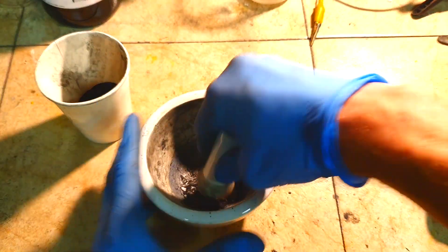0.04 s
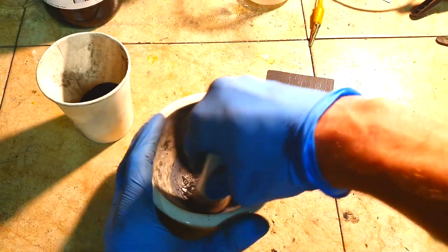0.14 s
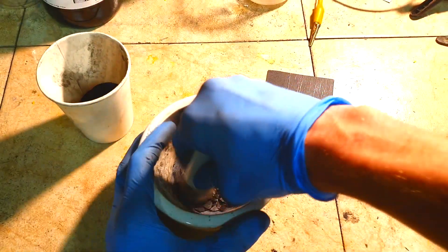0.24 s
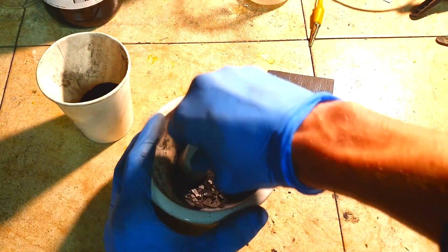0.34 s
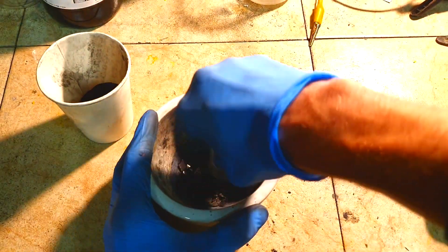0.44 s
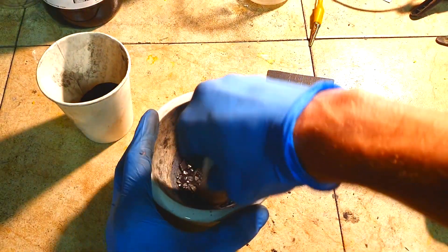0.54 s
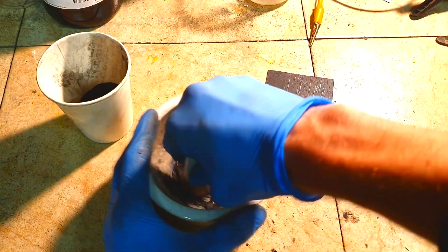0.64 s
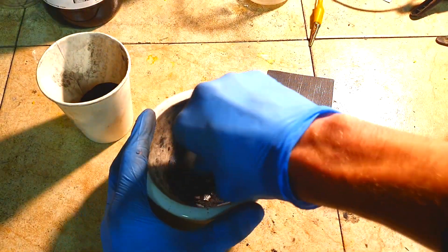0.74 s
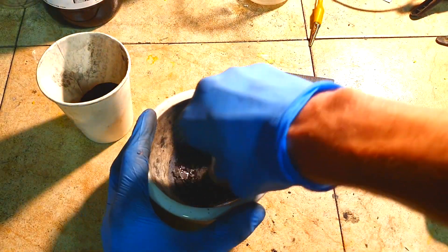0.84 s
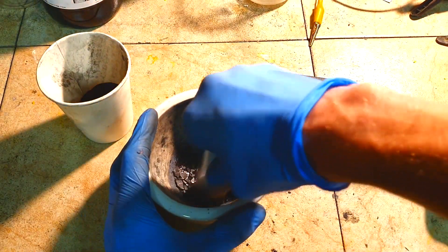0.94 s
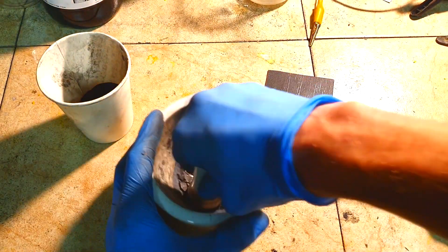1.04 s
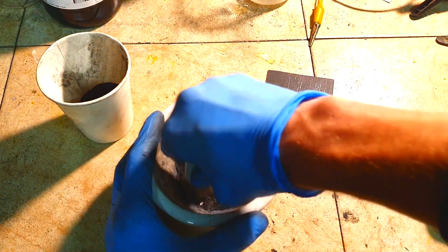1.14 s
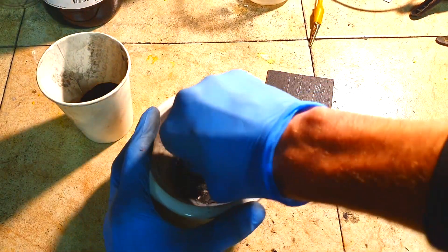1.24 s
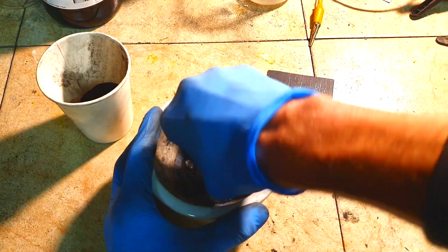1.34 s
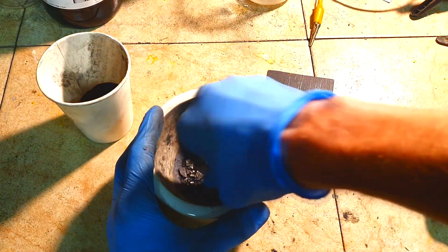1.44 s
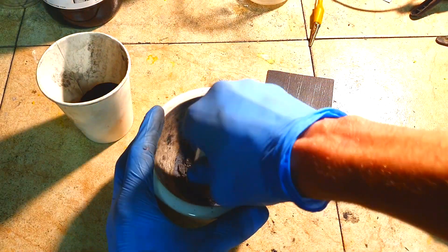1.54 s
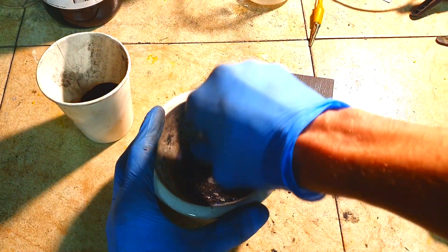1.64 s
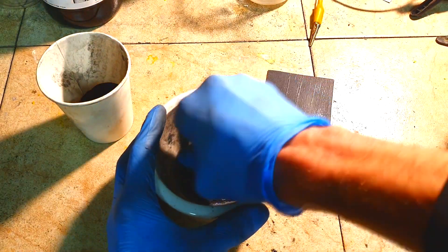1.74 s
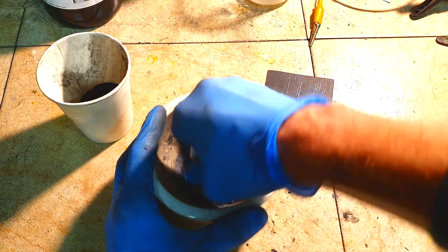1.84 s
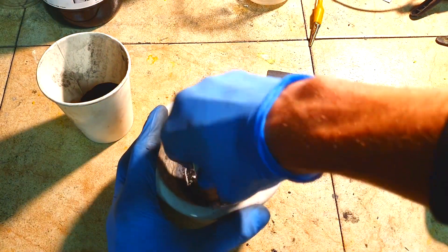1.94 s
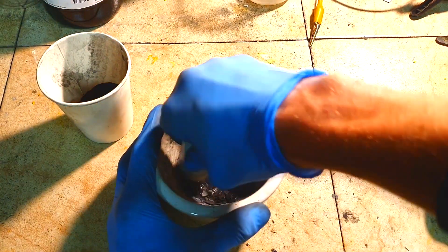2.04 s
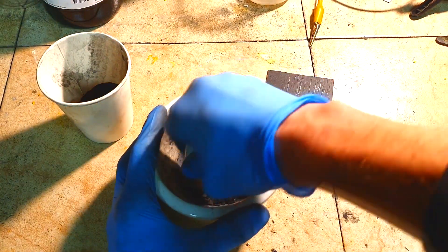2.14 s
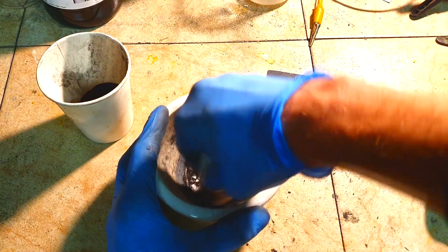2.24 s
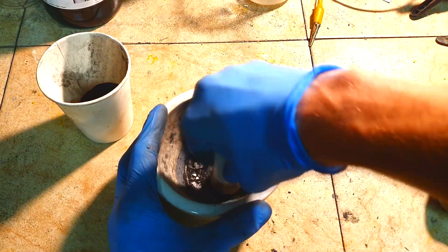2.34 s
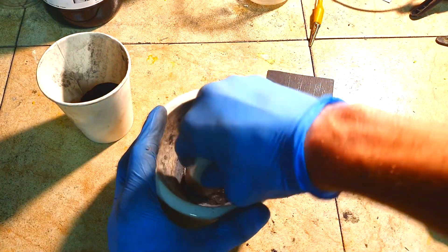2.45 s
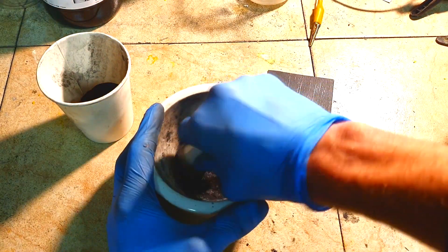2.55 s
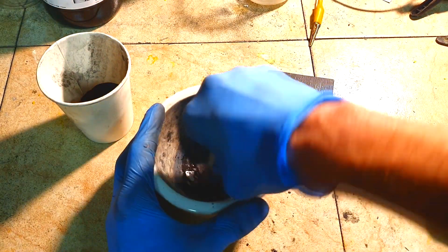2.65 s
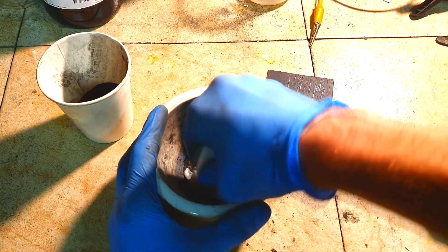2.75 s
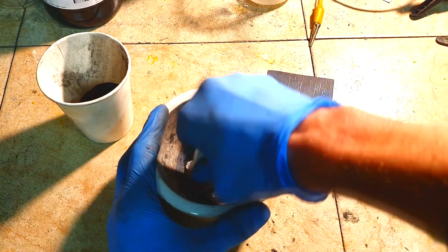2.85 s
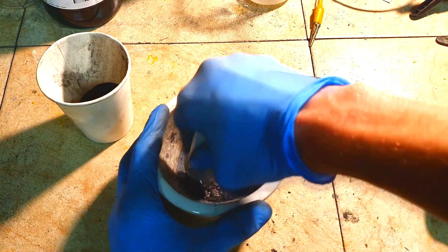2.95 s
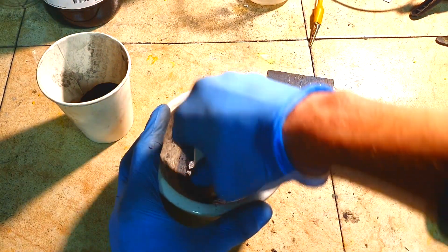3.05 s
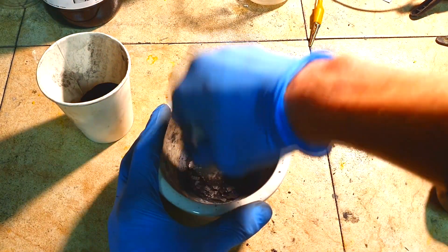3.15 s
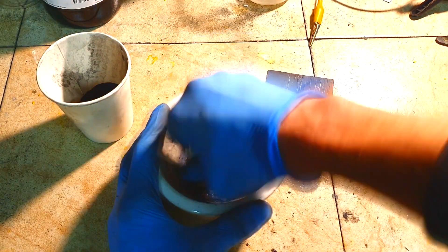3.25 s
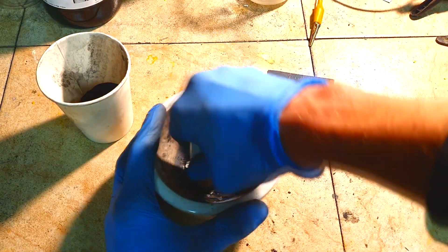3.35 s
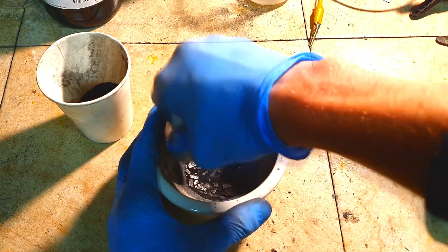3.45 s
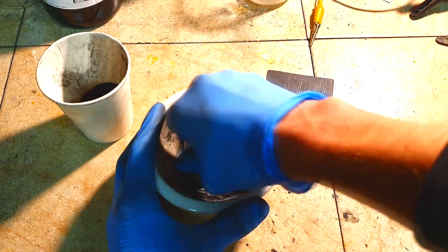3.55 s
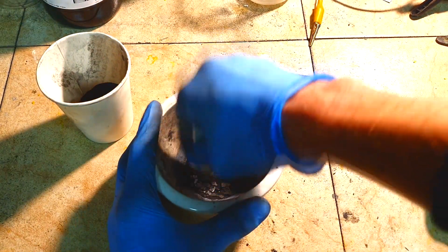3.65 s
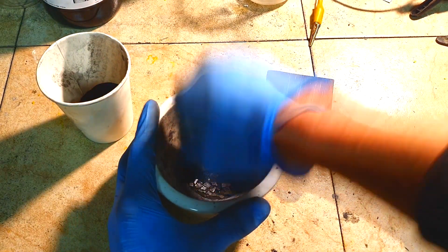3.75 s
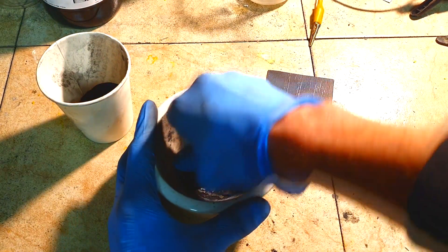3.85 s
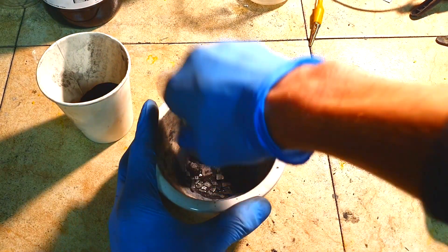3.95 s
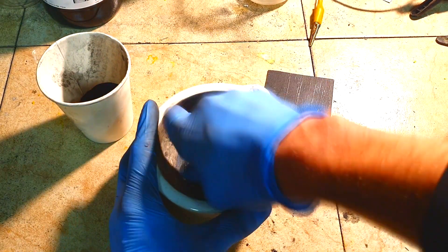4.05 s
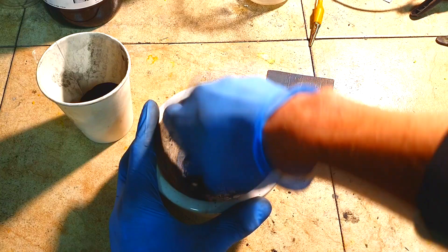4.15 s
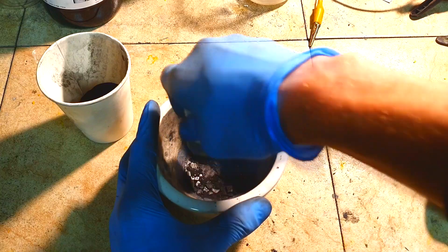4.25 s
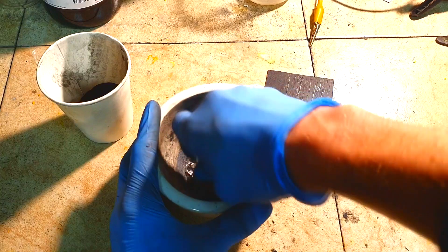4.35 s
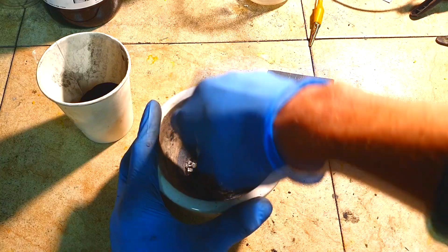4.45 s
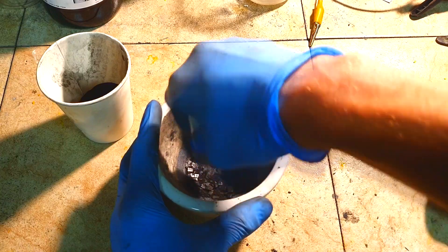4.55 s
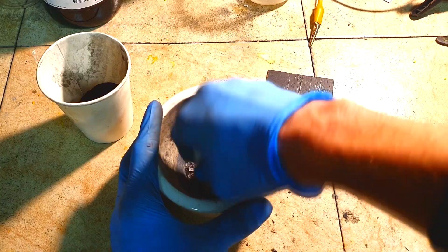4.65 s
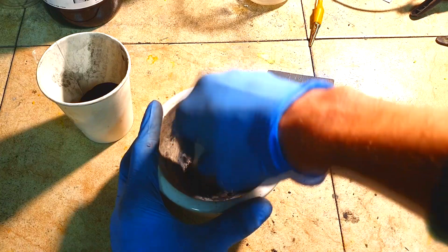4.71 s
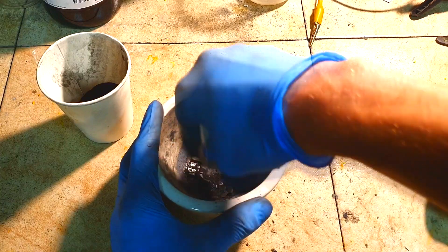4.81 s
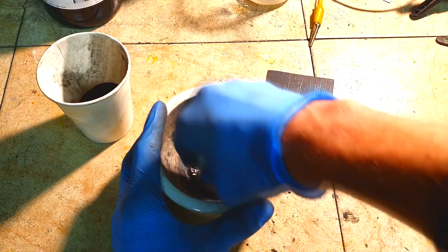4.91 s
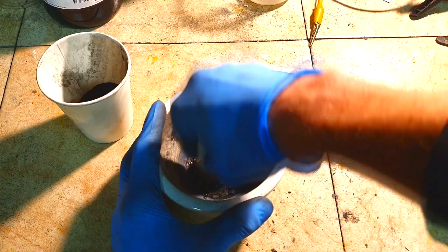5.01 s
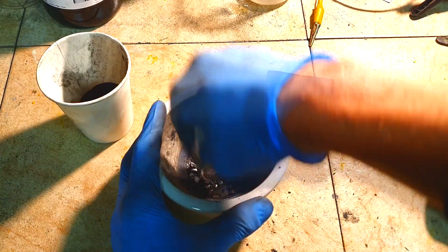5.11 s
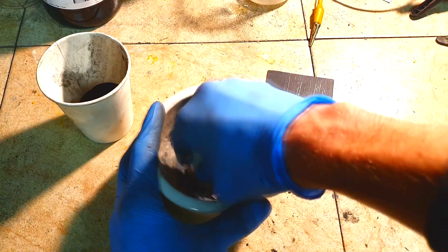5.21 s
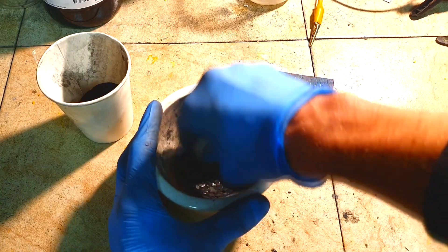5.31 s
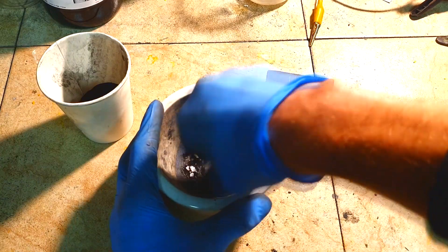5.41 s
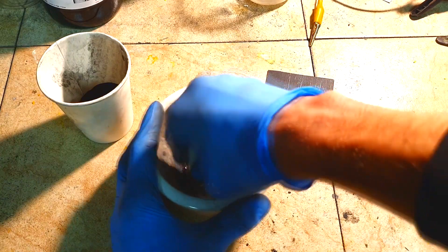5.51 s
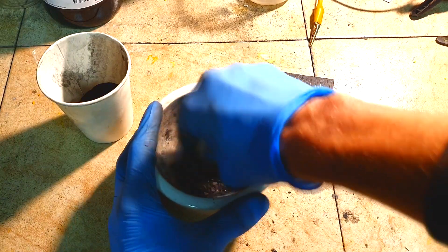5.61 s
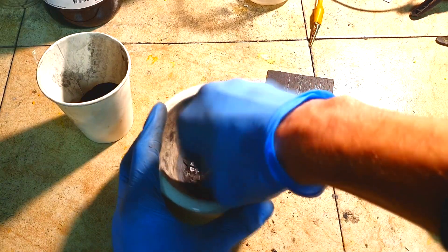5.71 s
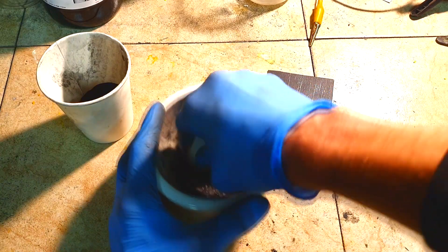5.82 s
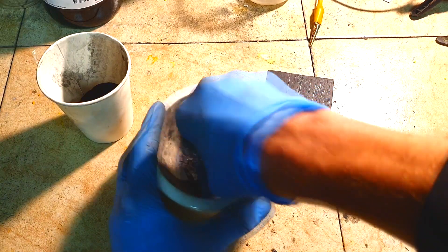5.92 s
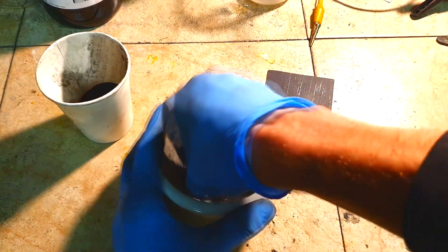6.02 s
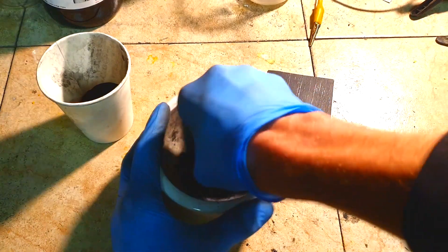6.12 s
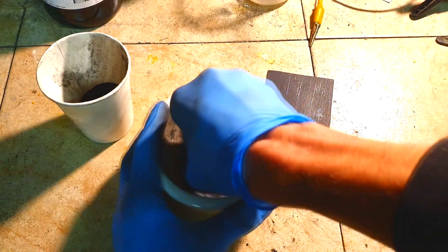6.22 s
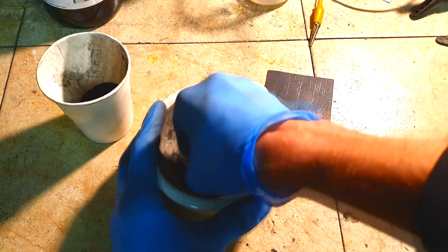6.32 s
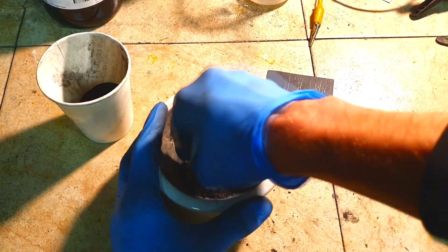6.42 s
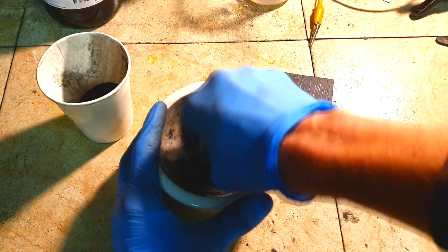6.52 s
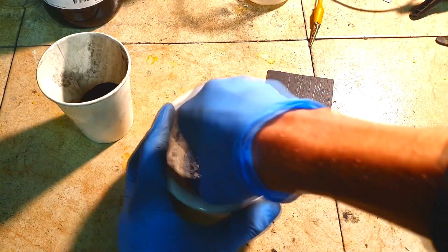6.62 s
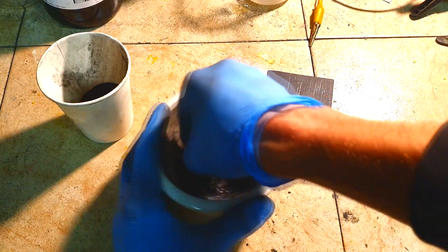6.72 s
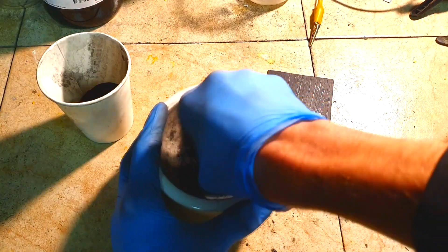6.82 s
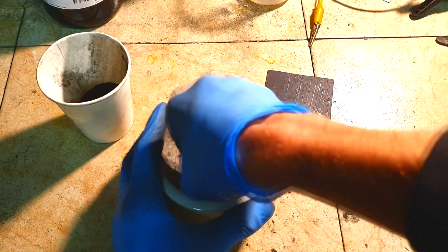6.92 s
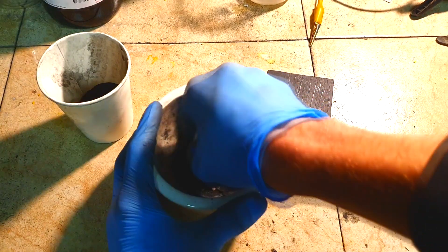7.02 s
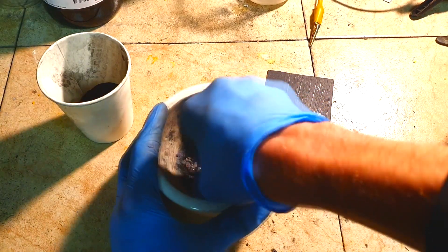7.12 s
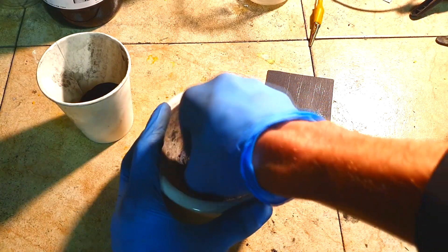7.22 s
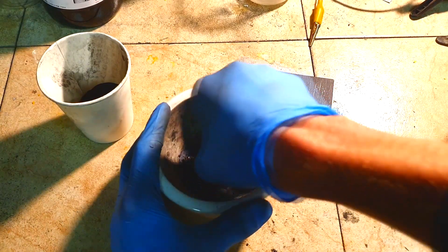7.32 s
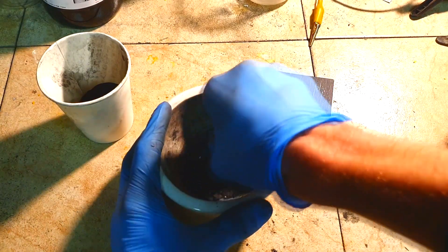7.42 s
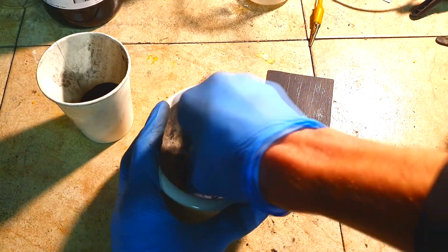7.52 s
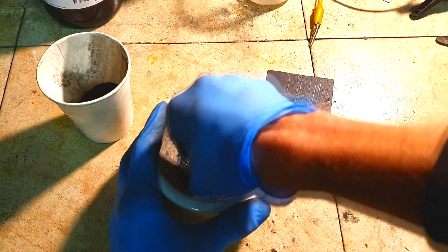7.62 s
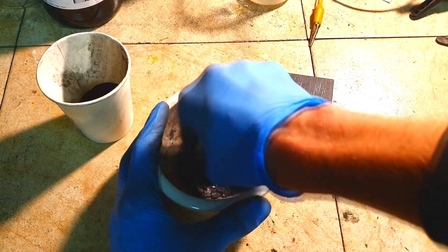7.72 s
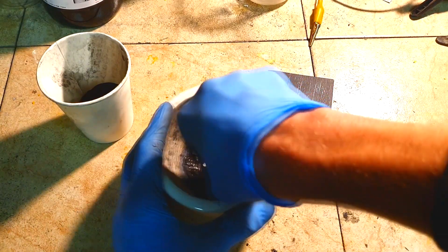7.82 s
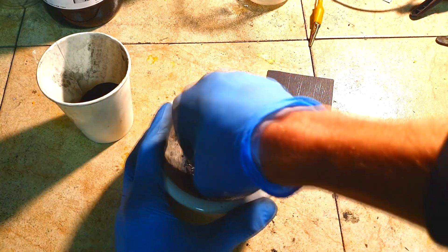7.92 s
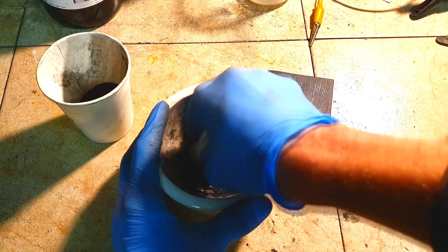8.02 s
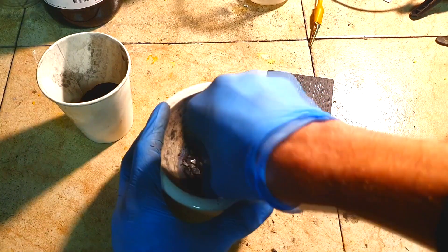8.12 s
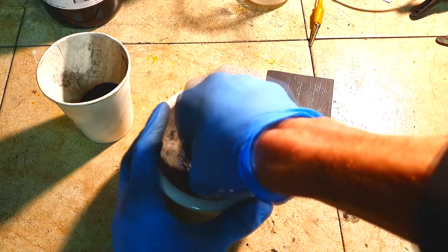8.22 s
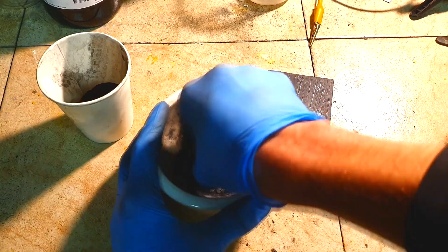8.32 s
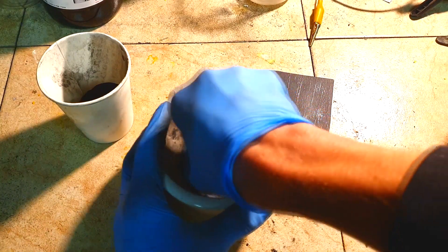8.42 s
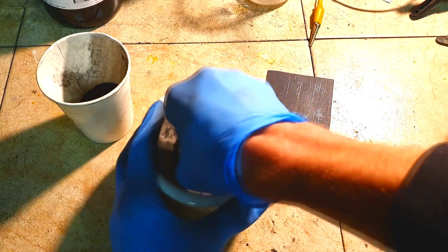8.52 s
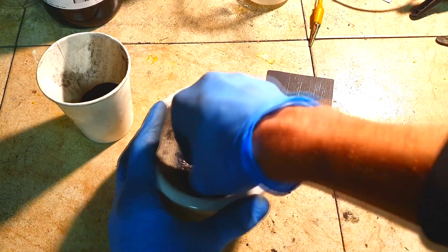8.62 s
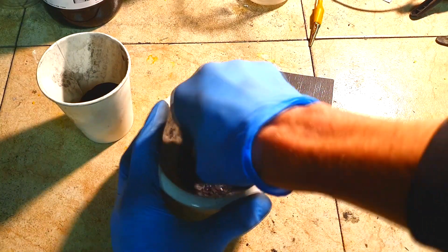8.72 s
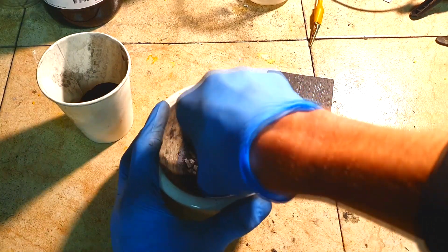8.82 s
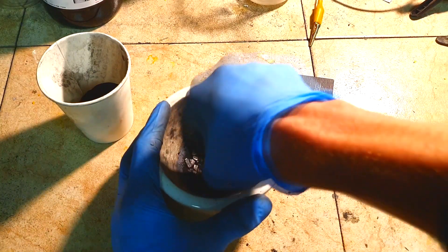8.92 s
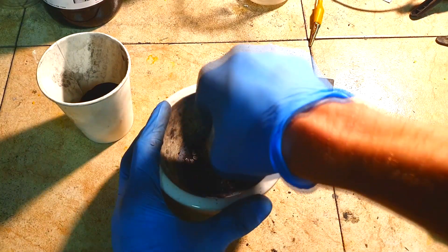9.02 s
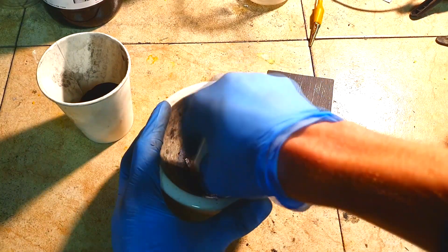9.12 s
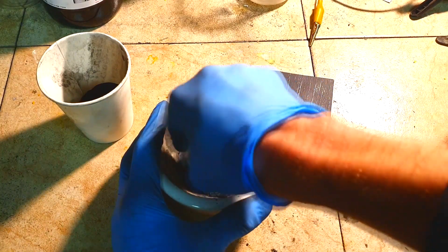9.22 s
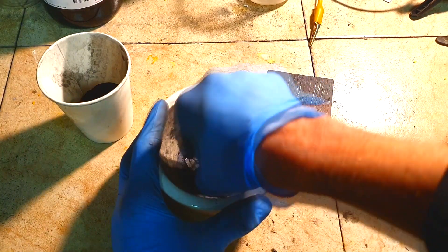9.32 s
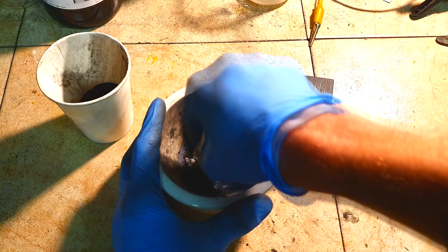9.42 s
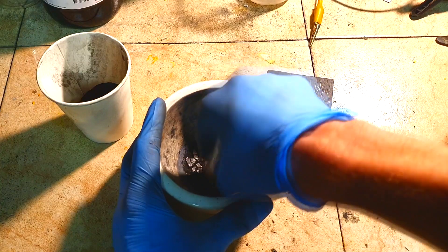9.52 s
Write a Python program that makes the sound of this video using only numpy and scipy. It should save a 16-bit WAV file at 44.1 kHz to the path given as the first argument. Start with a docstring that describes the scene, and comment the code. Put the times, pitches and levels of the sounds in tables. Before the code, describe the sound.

In a small quiet room, a pestle rubs and taps inside a ceramic bowl, ringing it briefly. Then hard blows come about four a second, thumping the bench and shattering flakes. Longer grinding follows, with stuttering knocks, brittle crunches and fine dusty fizz, before a few final bright clacks. Close stereo pickup, with faint air and low rumble underneath.

```python
"""On a bench in a small room, a ceramic pestle knocks, pounds and grinds brittle flakes in a ceramic mortar.
Blows and slips shake the bench, heard as sums of dying sine waves; knocks on the wall ring the bowl.
Clacks, snaps and fizz are short puffs of coloured noise; grinding sets off many tiny grains of sound.
Noise tails give the answer of the room, over quiet air and a low rumble."""
import sys
import numpy as np
from scipy import signal
from scipy.fft import rfft, irfft, next_fast_len
from scipy.io import wavfile
from scipy.ndimage import uniform_filter1d

SR = 44100
rng = np.random.default_rng(int(sys.argv[2]) if len(sys.argv) > 2 else 0)


def unload_audio(sound):
    """Save the sound as a 16-bit wav file, at the path given as the first command line argument."""
    columns = np.transpose(np.atleast_2d(sound))
    # keep every value between -1 and 1, then stretch to whole-number steps
    steps = np.round(np.clip(columns, -1, 1) * 32767)
    wavfile.write(sys.argv[1], SR, steps.astype(np.int16))


N = 421596  # samples in the whole scene


def gain_of(db):
    """Turns decibels into a gain."""
    return 10 ** (np.asarray(db) / 20)


def evened(x):
    """Scales a sound to an average (rms) strength of 1."""
    return x / np.sqrt(np.mean(x ** 2) + 1e-20)


def read(points, hz):
    """Reads a table of (pitch_hz, value) between its points, on a log pitch axis."""
    f, value = np.transpose(points)
    return np.interp(np.log(hz + 1), np.log(f + 1), value)


def add(mix, s, sound):
    """Mixes a sound in at time s, cut off at the end of the mix."""
    part = mix[..., round(s * SR):][..., :sound.shape[-1]]
    part += sound[..., :part.shape[-1]]


def coloured(x, spectrum):
    """Makes some pitches of a noise louder than others, as a spectrum table says."""
    size = next_fast_len(x.shape[-1])
    hz = np.fft.rfftfreq(size, 1 / SR)
    return irfft(rfft(x, size) * gain_of(read(spectrum, hz)), size)[..., :x.shape[-1]]


# How alike noise is in the left and right channels: pitch_hz, likeness (1 = identical)
LIKENESS = [(60, 0.81), (250, 1), (700, 0.4), (1500, 0.27), (5000, 0.083)]


def pair(length, shape):
    """Two-channel noise, most alike in the bass, weighted over pitch and time by shape(hz, t)."""
    frames, hz = length // 128 + 5, np.fft.rfftfreq(512, 1 / SR)[:, None]
    a, b, c, d = rng.standard_normal((frames, 257, 4)).T
    left, other = a + 1j * b, c + 1j * d
    same = np.clip(read(LIKENESS, hz), 0, 1)
    right = same * left + np.sqrt(1 - same ** 2) * other
    z = np.array([left, right]) * shape(hz, np.arange(frames) * 128 / SR)
    return signal.istft(z, nperseg=512, noverlap=384)[1][:, :length]


def burst(spectrum, t60):
    """A puff of coloured noise that starts sharply and falls 60 dB in t60 seconds; peak 1."""
    t = np.arange(6000) / SR
    x = evened(coloured(pair(6000, lambda hz, s: 1), spectrum)) * gain_of(-60 * t / t60)
    return x / abs(x).max()


# Ways the bench vibrates: pitch_hz before detuning, level_db (relative), fade_s (to fall 60 dB, before damping)
BENCH_MODES = [(51.5, -25, 1), (106, -28, 1), (219.3, -10.5, 0.57), (261, -5.5, 0.17), (311.4, 2, 0.1),
               (429.2, -0.5, 0.23), (524.2, -3, 0.14), (665, 2.5, 0.043), (740.5, 4.5, 0.059),
               (812, 5.5, 0.054), (1100, -0.5, 0.084), (1236, 0.5, 0.043), (1422, -4, 0.047)]


def thud(scatter_db, damping, rise_s, hard_db):
    """Bench modes sum to a thud, weighted and detuned anew by where the pestle lands; peak 1."""
    # each mode comes as a close pair
    hz, db, t60 = np.transpose(BENCH_MODES + BENCH_MODES)[:, :, None]
    weight, phase, detune, wide = rng.standard_normal((4, len(hz), 1))
    t = np.arange(6000) / SR
    brightness = hard_db * np.log2(np.maximum(hz / 300, 1))  # a hard landing lifts the higher modes
    level = gain_of(db + scatter_db * weight + brightness - 60 * damping * t / t60)
    turn = 2 * np.pi * hz * (1 + 0.035 * detune) * t + 1.32 * phase
    shift = wide * hz ** 2 / 1710000.0  # higher modes differ more between left and right
    x = np.array([(level * np.sin(turn + side * shift)).sum(0) for side in (1, -1)])
    quick = 1 + 0.92 * np.exp(-t / 0.0095)  # the first swings are strong and spread away fast
    x = x * quick * np.minimum(t / rise_s, 1) * np.minimum(4 - 4 * t / t[-1], 1)
    return x / abs(x).max()


# The pestle's own thin ring: pitch_hz, level_db (relative), fade_s (to fall 60 dB)
PESTLE_MODES = [(15070, -6.5, 0.068), (14520, -5, 0.12), (14800, -16, 0.12)]


def pestle(db):
    """The pestle sings briefly: a few high sine waves that die away."""
    hz, mode_db, t60 = np.transpose(PESTLE_MODES)[:, :, None]
    t = np.arange(6000) / SR
    level = gain_of(db + mode_db - 60 * t / t60)
    return (level * np.sin(2 * np.pi * hz * t)).sum(0) * np.ones((2, 1))


# Ceramic on ceramic, as noise: pitch_hz, level_db (relative)
CLACK_SPECTRUM = [(700, -6.5), (1100, 4.5), (1400, -4), (1620, -7), (2000, 4), (2900, -2.5), (3800, -8),
                  (6000, -17.5), (11000, -39)]
# Flakes shattered by a blow: pitch_hz, level_db (relative)
SHATTER_SPECTRUM = [(3000, -4.5), (7000, -5.5), (9500, -8), (13500, -3.5), (16500, -18)]
# Rough ceramic body around the bowl's ring: pitch_hz, level_db (relative)
CLANG_SPECTRUM = [(1800, -49), (2500, 8), (3900, 8), (5000, -10), (9000, -20)]
# Pestle blows: start_s, thud_db, ring_db (bowl), clack_db, snap_db (all relative),
# damping (factor, from the grip), lean_db (towards the upper twin mode of the bowl)
PESTLE_BLOWS = [(0.137, -16.5, -13, -14, -50, 0.71, -1), (1.023, -11, -12.5, -10.5, -66, 1.16, 2),
                (1.701, -19.5, -15.5, -17, -47, 3.6, 5), (2.119, -13, -17, -15.5, -55, 2.3, 10.5),
                (3.022, -5.5, -39, -36, -17, 1.3, -6), (3.275, 0.5, -38, -9.5, -13.5, 1.1, 8),
                (3.53, -2, -18.5, -11.5, -21, 2.6, 3), (3.792, 2, -40, -8.5, -19, 0.8, 13),
                (3.811, -19, -27, -15.5, -38, 4.8, 15), (4.072, -2.5, -68, -16, -17, 1.6, 3),
                (4.342, 2, -33.5, -16.5, -13, 5.4, -13), (4.638, 0, -47, -17, -20, 1.1, -8),
                (4.903, -2.5, -48, -17.5, -17, 1.4, 8), (5.182, 3.5, -50, -8.5, -22, 1.3, 4),
                (7.427, -12.5, -17, -12.5, -42, 2.7, -12), (9.124, -4.5, -17, -6.5, -23, 12, -2),
                (9.29, -8.5, -11.5, -12, -26, 2.2, 6), (9.499, -3.5, -19.5, -5.5, -16.5, 5.8, -26)]
PESTLE_DB = -15.5  # thin ring against the snap of the blow, or its clack where that is far louder


def blows():
    """Thud through the bench, clack of ceramic on ceramic, and snapping flakes that scatter."""
    out = np.zeros((2, N))
    for s, thud_db, ring_db, clack_db, snap_db, *_ in PESTLE_BLOWS:
        clack = burst(CLACK_SPECTRUM, 0.06) + 0.56 * burst(CLACK_SPECTRUM, 0.23)
        snap = burst(SHATTER_SPECTRUM, 0.023) + 0.42 * burst(SHATTER_SPECTRUM, 0.17)
        add(out, s, gain_of(thud_db) * thud(2.52, 1.7, 0.0043, 0.095))
        add(out, s, gain_of(clack_db) * clack)
        add(out, s, gain_of(snap_db) * snap)
        add(out, s, pestle(max(snap_db, clack_db - 13.5) + PESTLE_DB))
        add(out, s, gain_of(ring_db + 7.0) * burst(CLANG_SPECTRUM, 0.11))
    return out


# Twin ringing modes of the bowl: pitch_hz, level_db (relative), fade_s (to fall 60 dB, before damping)
BOWL_MODES = [(3123, 0, .25), (3173, 0, .31), (7546, -12, .2), (7639, -17, .24), (14427, -24, .12),
              (14640, -34, .2)]
GRIP_DB_PER_S2 = 116  # the pestle settles against the wall and chokes the ring; scaled by damping squared


def ring(db, damping, lean_db, overtone_db):
    """Twin modes of the bowl beat together; the gloved hand damps them and shades the right side."""
    hz, mode_db, t60 = np.transpose(BOWL_MODES)[:, :, None]
    t, k = np.arange(SR // 2) / SR, np.arange(len(BOWL_MODES))[:, None]
    strike_db = db + mode_db - lean_db * (-1) ** k + overtone_db * np.log2(hz / hz[0])
    fade_db = 60 * damping * t / t60 + GRIP_DB_PER_S2 * (damping * t) ** 2
    tone = (gain_of(strike_db - fade_db) * np.sin(2 * np.pi * hz * t)).sum(0)
    return tone * gain_of([[1.5], [-2.5]]) * np.minimum(t / 0.0016, 1)


# overtone tilt in dB per octave: a clean strike, with more ring than clack, wakes the overtones
OVERTONE_DB, OVERTONE_PER_DB = 1.9, 3


def rings():
    """The bowl's ring after each blow, brighter for a clean strike."""
    out = np.zeros((2, N))
    for s, _, ring_db, clack_db, _, *place in PESTLE_BLOWS:
        overtone_db = OVERTONE_DB + OVERTONE_PER_DB * (ring_db - clack_db)
        add(out, s, ring(ring_db, *place, overtone_db))
    return out


# The pestle slips over a flake and lands: start_s, thud_db, clack_db (relative), hardness_db (per octave)
PESTLE_SLIPS = [(0.239, -23, -50, -23), (0.454, -13.5, -20, 1), (1.197, -19, -29, 0),
                (1.766, -12, -18, 1.5), (2.142, -10, -13.5, 6), (2.703, -20, -46, -20), (4.92, -6, -18, 3),
                (5.572, -14.5, -27.5, 5), (5.723, -15.5, -25, 16), (5.818, -18, -22, 8),
                (6.495, -12.5, -46, -7.5), (6.549, -12.5, -16, 33), (6.644, -20.5, -25, -14),
                (6.692, -9, -38, -3.5), (7.008, -13.5, -20, -5), (7.065, -17, -19, 31),
                (7.529, -16, -49, -11), (7.585, -8, -29, -9.5), (7.729, -8, -32.5, -9),
                (8.198, -6.5, -47, -5.5), (8.631, -14.5, -33, -4.5), (8.806, -14.5, -33, 6),
                (8.862, -12, -34, -0.5)]


def slips():
    """The pestle slips and lands: a bench thud and a clack of ceramic each time."""
    out = np.zeros((2, N))
    for s, thud_db, clack_db, hard_db in PESTLE_SLIPS:
        add(out, s, gain_of(thud_db) * thud(7.5, 1.3, 0.0034, hard_db))
        add(out, s, gain_of(clack_db) * burst(CLACK_SPECTRUM, 0.097))
    return out


# Fizz of breaking flakes and dust: pitch_hz, level_db (relative)
FIZZ_SPECTRUM = [(2400, -10), (5000, -10), (15000, -9.5), (16500, -62)]
# Single flakes snap: start_s, level_db (relative)
FLAKE_SNAPS = [(0.359, -22.5), (0.397, -26), (1.1835, -19.5), (1.767, -15), (2.4757, -18.5), (3.285, -24),
               (4.516, -26.5), (5.3513, -16.5), (5.462, -20), (5.9686, -9), (7.155, -19.5), (8.163, -19),
               (9.2189, -16.5), (9.275, -27)]


def snaps():
    """Lone flakes break, each a very short puff of noise."""
    out = np.zeros((2, N))
    for s, db in FLAKE_SNAPS:
        add(out, s, gain_of(db) * burst(FIZZ_SPECTRUM, 0.023))
    return out


# Grinding strokes: start_s, length_s (until lift-off), pressure_db, scrape_db, fizz_db (relative)
GRIND_STROKES = [(0.18, 0.25, -36, -77, -47), (0.506, 0.27, -38, -56.5, -49.5),
                 (1.016, 0.26, -40.5, -64, -46), (1.328, 0.21, -41.5, -42.5, -53.5),
                 (1.7, 0.24, -40, -50, -50), (2.181, 0.16, -35.5, -58, -47.5),
                 (2.401, 0.35, -33.5, -57, -43), (5.215, 0.37, -35.5, -67, -48),
                 (5.592, 0.52, -35.5, -45, -48), (6.199, 0.17, -39, -50.5, -52.5),
                 (6.447, 0.37, -35, -70, -44), (6.868, 0.34, -33.5, -38, -43.5),
                 (7.485, 0.11, -29, -54, -46), (7.672, 0.37, -32.5, -61, -44.5),
                 (8.075, 0.33, -33.5, -39, -43.5), (8.454, 0.31, -38.5, -47.5, -46.5),
                 (8.827, 0.0097, -34, -18, -47)]
LEAN_S, LIFT_DB_PER_S = 0.027, 335  # time to lean in, and speed of the fade on lifting off


def control(column):
    """One column of the strokes as a gain over time: lean in, hold, lift off."""
    t, rows = np.arange(0, N, 64) / SR, np.array(GRIND_STROKES)
    since = t - rows[:, :1]
    lean = np.clip(since / LEAN_S, 0, 1) ** 2
    lift = gain_of(-LIFT_DB_PER_S * np.maximum(since - rows[:, 1:2], 0))
    return np.interp(np.arange(N) / SR, t, gain_of(rows[:, column]) @ (lean * lift))


# A lump of flakes gives way under the pestle: peak_s (crunch loudest), length_s, crunch_db (relative)
LUMP_CRUNCHES = [(0.837, 0.15, -32.5), (1.243, 0.033, -35.5), (1.417, 0.075, -33.5), (1.515, 0.068, -40),
                 (2.544, 0.023, -31.5), (2.687, 0.15, -29), (5.576, 0.034, -27.5), (5.737, 0.08, -33.5),
                 (5.849, 0.03, -18.5), (5.977, 0.13, -29), (6.108, 0.07, -28), (6.271, 0.13, -34),
                 (6.635, 0.17, -30), (6.763, 0.11, -29.5), (6.912, 0.14, -29), (7.158, 0.063, -27.5),
                 (7.299, 0.04, -31.5), (7.861, 0.13, -35), (8.016, 0.021, -32), (8.084, 0.096, -37),
                 (8.174, 0.16, -33), (8.275, 0.023, -27.5), (8.308, 0.037, -25.5), (8.521, 0.093, -35),
                 (8.743, 0.048, -30), (8.887, 0.11, -44)]
BUILD_S = 0.012  # the force peaks this long before the crunch is loudest


def crunches():
    """The force of each crunch swells and sinks in one rounded arch."""
    t = np.arange(0, N, 64) / SR
    peak, length, db = np.transpose(LUMP_CRUNCHES)[:, :, None]
    arch = np.cos(np.pi * np.clip((t + BUILD_S - peak) / length, -.5, .5)) ** 2
    return np.interp(np.arange(N) / SR, t, (gain_of(db) * arch).sum(0))


def grains(per_s, spread_db):
    """Random clicks of both signs, a few of them large; rms 1."""
    place, size, sign, keep = rng.random((6000, 4)).T
    kept = keep * 6000 < per_s * N / SR
    out = np.zeros(N)
    out[(place * N).astype(int)] = kept * gain_of(-spread_db * np.log(size + 0.02)) * np.sign(sign - .5)
    return evened(out)


def scatter(shapes, gain, per_s, spread_db):
    """Each grain shape is set off by its own random clicks, as strong as gain says."""
    sound = np.zeros((2, N))
    for shape in shapes:
        train = gain * grains(per_s, spread_db)
        sound += signal.oaconvolve(train[None], shape / np.linalg.norm(shape[0]), axes=1)[:, :N]
    return sound / np.sqrt(len(shapes))


def wander(size):
    """Random ups and downs: noise smoothed twice over size samples."""
    return evened(uniform_filter1d(uniform_filter1d(rng.standard_normal(N), size), size))


# Grit crunching against the bowl: pitch_hz, level_db (relative)
GRIT_SPECTRUM = [(600, -11), (1150, 3), (1650, -11), (2100, -6), (4000, -21.5), (7000, -35)]
CRUNCH_PUSH_DB, CRUNCH_FIZZ_DB = -0.5, -25.5  # how much each crunch also shakes the bench and throws dust


def grind():
    """Uneven stick-slip pushes ring the bench; grit crunches against the bowl; dust and flakes fizz."""
    quick, slow = wander(400), wander(1800)
    flicker = gain_of(2.5 * quick + 4.1 * slow)  # flakes break in clumps that swell and fade
    clumps = gain_of(np.clip(3.7 * quick, -9, 3))  # the pestle catches and lets go
    soft = np.minimum(np.arange(2000) / 70, 1)  # a lump gives way gradually
    lumps = crunches()
    bench = [thud(3.8, 1.2, 0.0049, -1.66) for _ in range(7)]
    bits = [soft * burst(GRIT_SPECTRUM, 0.035)[:, :2000] for _ in range(6)]
    specks = [burst(FIZZ_SPECTRUM, 0.0196)[:, :900] for _ in range(6)]
    pressure = control(column=2) + gain_of(CRUNCH_PUSH_DB) * lumps
    push = scatter(bench, clumps * pressure, 45, 5.57)
    scrape = scatter(bits, flicker * control(column=3), 87, 4.34)
    crunch = scatter(bits, clumps * lumps, 150, 4.44)
    # dust stirs and settles slowly
    dust = uniform_filter1d(control(column=4), size=3000) + gain_of(CRUNCH_FIZZ_DB) * lumps
    fizz = scatter(specks, flicker * dust, 430, 2.5)
    return push + scrape + crunch + fizz


# Low bumps as the mortar rocks on the bench: peak_s, level_db (relative)
ROCKING_BUMPS = [(0.857, -30.5), (1.25, -36), (1.45, -36.5), (1.819, -38), (4.102, -33)]
BUMP_HZ, BUMP_S = 53.8, 0.035  # pitch before detuning, and width of the swell


def bumps():
    """A few low swings of the rocking mortar, the same in both microphones."""
    t, out = np.arange(-.15, .15, 1 / SR), np.zeros((2, N))
    chance = rng.standard_normal((len(ROCKING_BUMPS), 2))
    for (s, db), (detune, phase) in zip(ROCKING_BUMPS, chance):
        swing = np.sin(2 * np.pi * BUMP_HZ * (1 + 0.12 * detune) * t + phase)
        add(out, s + t[0], gain_of(db) * np.exp(-(t / BUMP_S) ** 2) * swing)
    return out


# How long the room keeps sounding: pitch_hz, fade_s (to fall 60 dB)
ROOM_FADE = [(200, 0.36), (1000, 0.32), (3200, 0.49), (15000, 0.23)]


def room(x):
    """Noise tails fade at a speed set by pitch; two take turns so the tail stays smooth."""
    tails = [pair(SR // 2, lambda hz, t: gain_of(-60 * t / read(ROOM_FADE, hz))) for _ in range(2)]
    start = np.clip(np.arange(SR // 2) / SR / 0.0032 - .5, 0, 1)  # nothing before the first reflection
    turn = 2 * np.pi * .9 * np.arange(N) / SR
    out = np.zeros((2, N))
    for tail, share in zip(tails, (np.cos(turn), np.sin(turn))):
        answer = start * tail / np.linalg.norm(tail[0])
        out += signal.oaconvolve((x.mean(0) * share)[None], answer, axes=1)[:, :N]
    return out


# Still air of the room: pitch_hz, level_db (relative)
HUSH_SPECTRUM = [(12, -62), (35, -9.5), (230, -3), (789, -16), (1640, -27), (3120, -21.5), (14600, -35.5),
                 (16300, -64)]
HUSH_DB = -54
# Low shaking of the microphone mount: pitch_hz, level_db (relative)
RUMBLE_SPECTRUM = [(33, -19.5), (52, -11), (110, -11.5), (160, -56)]


def background():
    """Still air, and rumble that reaches the microphones through the mount as the bench is pushed."""
    hush = gain_of(HUSH_DB) * evened(coloured(pair(N, lambda hz, t: 1), HUSH_SPECTRUM))
    low = evened(coloured(pair(N, lambda hz, t: 1), RUMBLE_SPECTRUM))
    pushing = uniform_filter1d(control(column=2) + 1.1 * crunches(), 4000)
    return hush + low * (gain_of(-51.5) + 0.033 * pushing)


RING_TO_ROOM = 0.4  # gain: share of the bowl's ring that goes to the room


def scene():
    """Mortar sounds, their room tail and the background."""
    mortar = blows() + slips() + snaps() + grind()
    bowl = rings()
    tail = gain_of(-5.5) * room(mortar + RING_TO_ROOM * bowl)
    return mortar + bowl + tail + bumps() + background()


EDGE_HZ = 16300  # highest pitch let through


def record(dry):
    """The left microphone is a little louder and earlier; peaks past full scale clip; then the band limit."""
    ports = np.array([gain_of(2.0) * dry[0], gain_of(0.97) * np.roll(dry[1], shift=2)])
    clipped = np.clip(ports, -1, 1)
    lowpass = signal.firwin(511, EDGE_HZ, window=("kaiser", 9), fs=SR)
    return np.clip(signal.oaconvolve(clipped, lowpass[None], "same"), -1, 1)


dry = scene()
out = record(dry)
unload_audio(out)
```